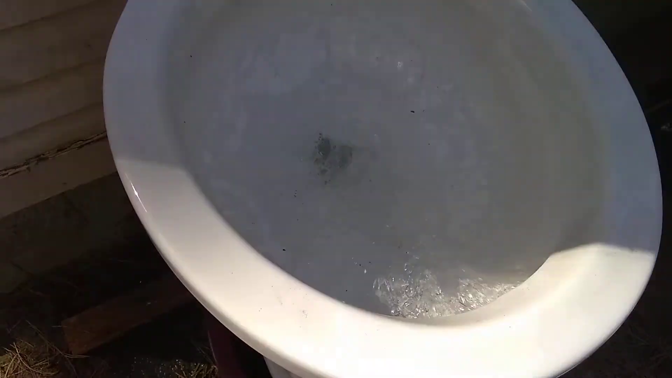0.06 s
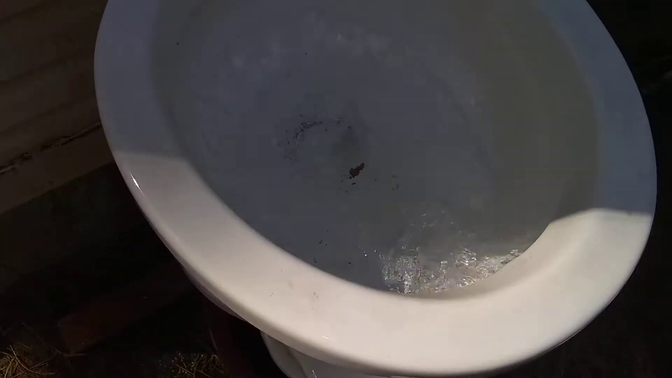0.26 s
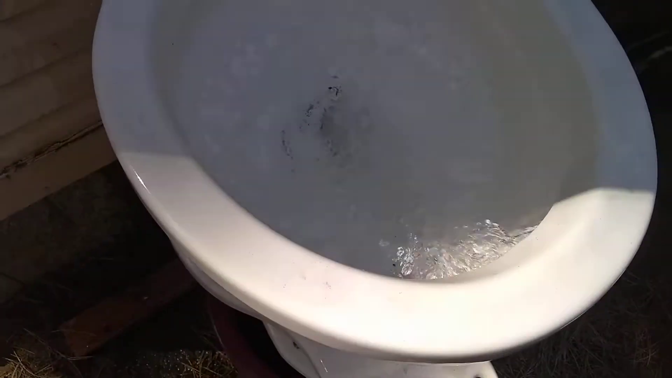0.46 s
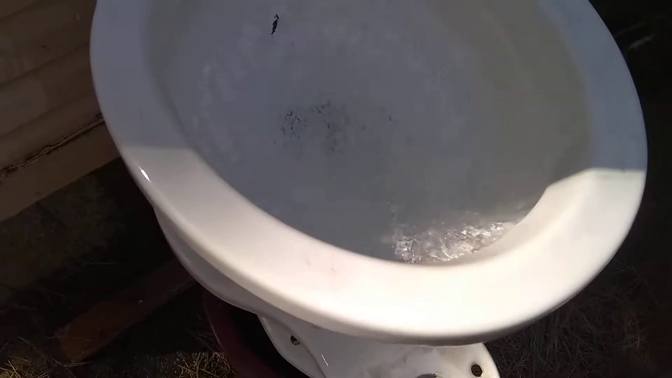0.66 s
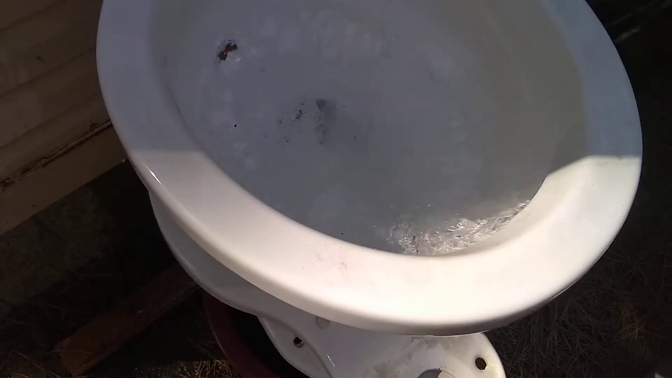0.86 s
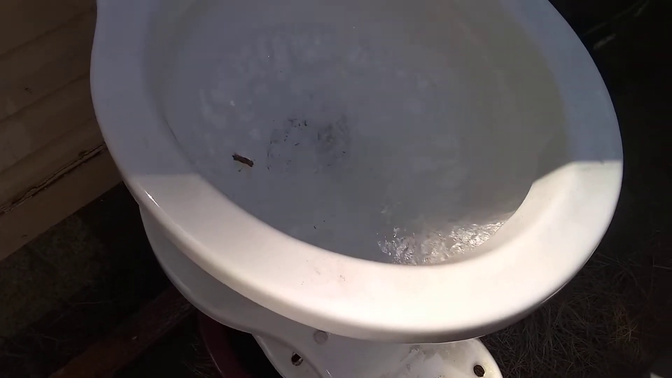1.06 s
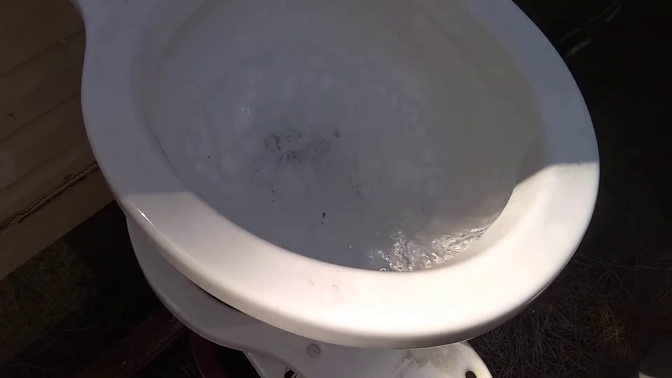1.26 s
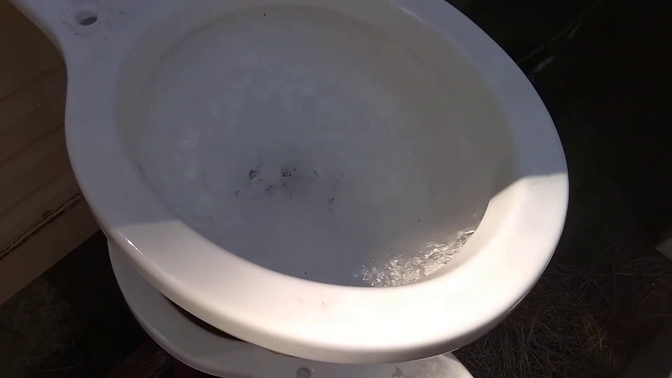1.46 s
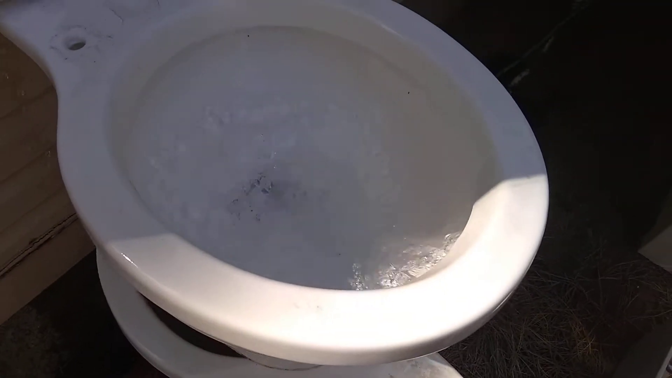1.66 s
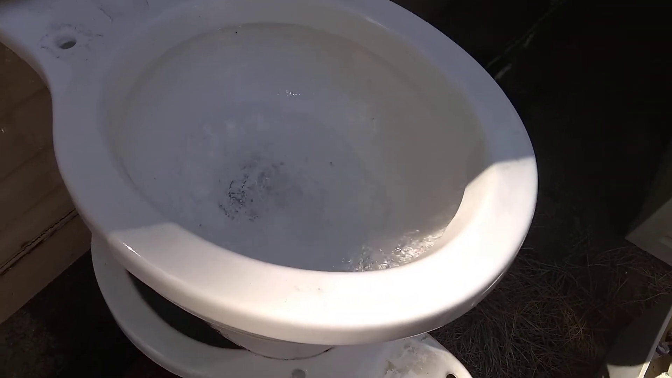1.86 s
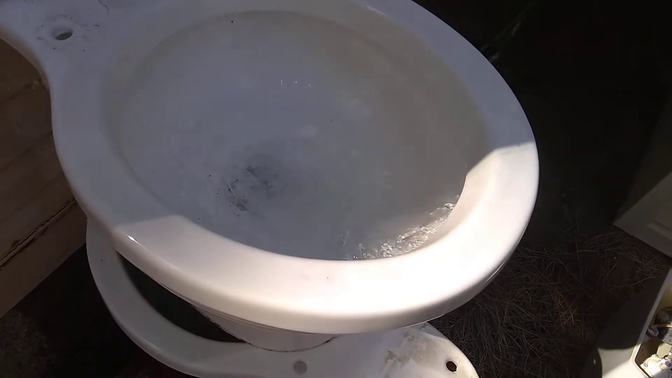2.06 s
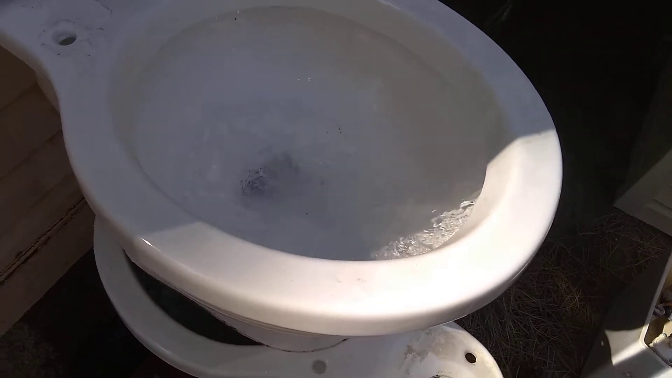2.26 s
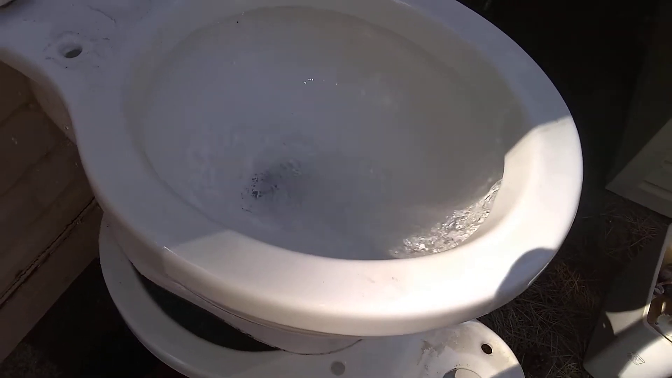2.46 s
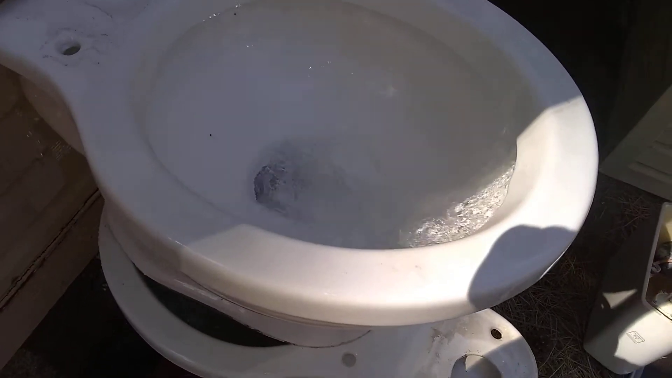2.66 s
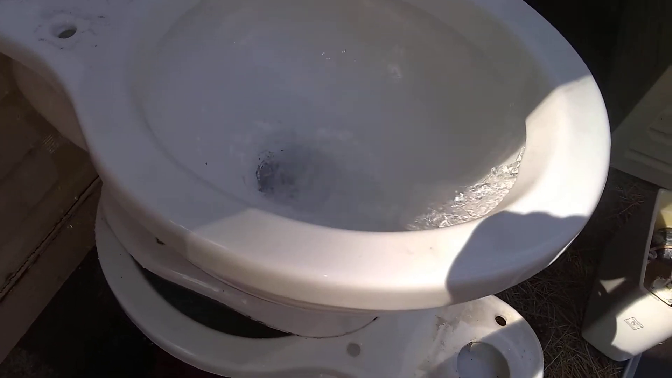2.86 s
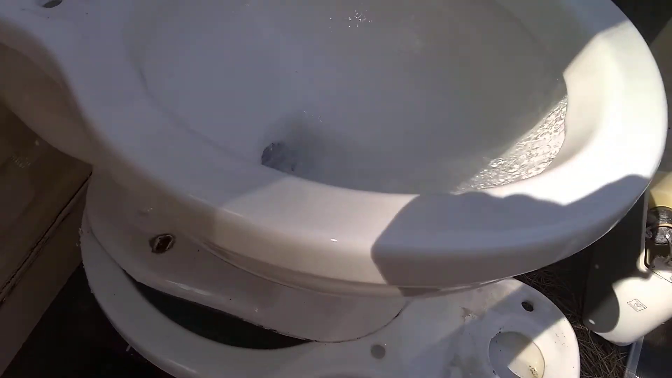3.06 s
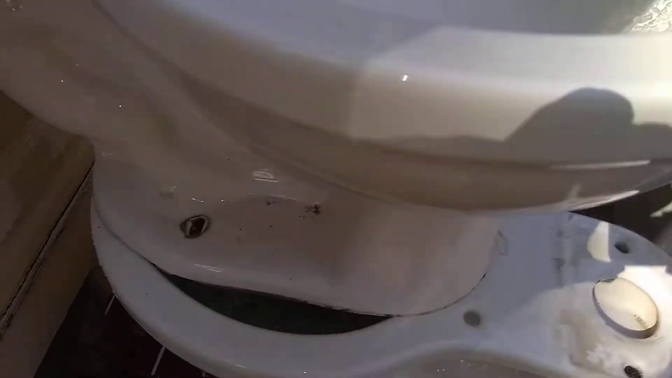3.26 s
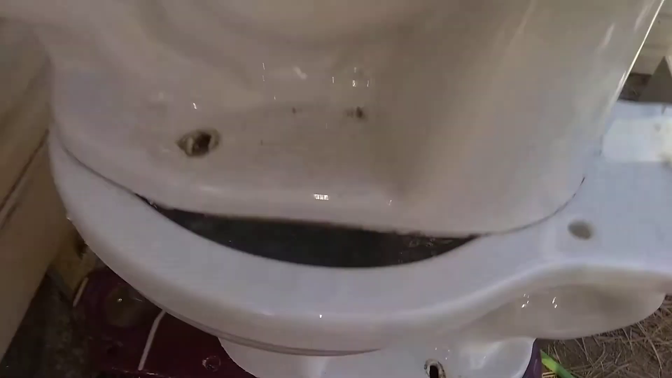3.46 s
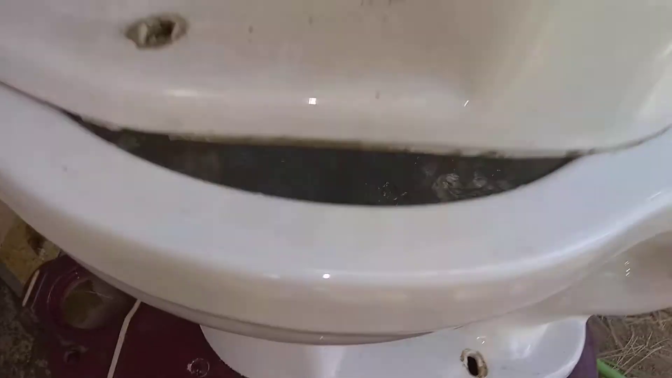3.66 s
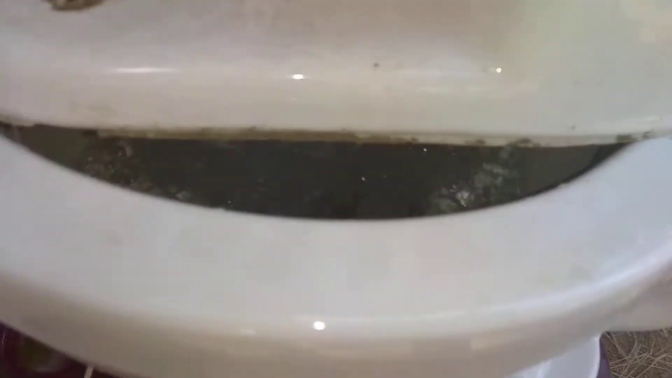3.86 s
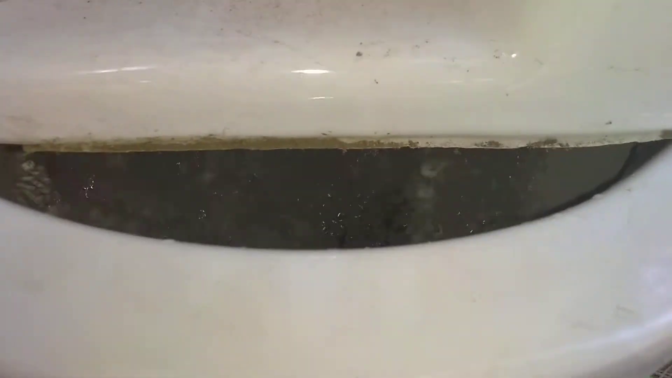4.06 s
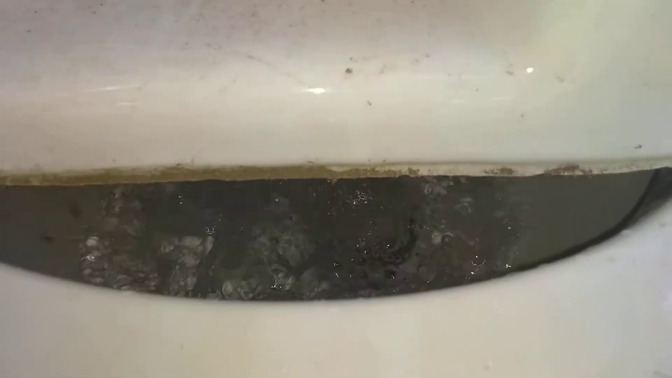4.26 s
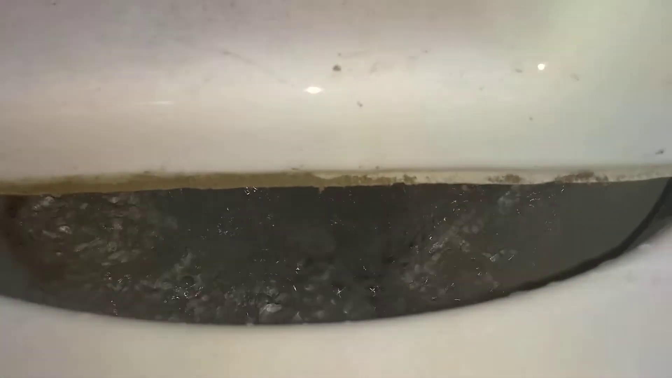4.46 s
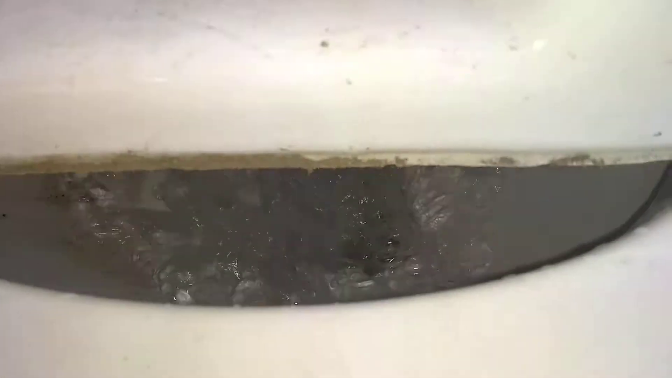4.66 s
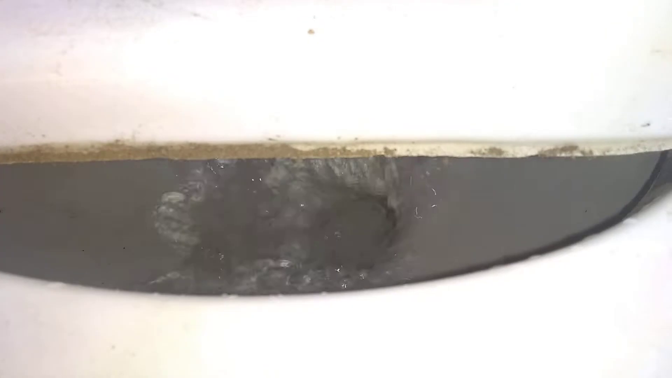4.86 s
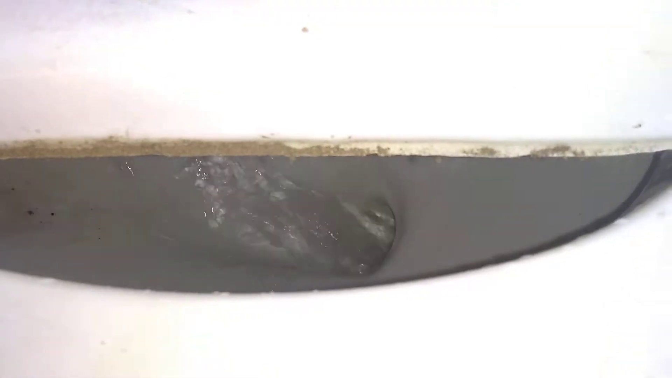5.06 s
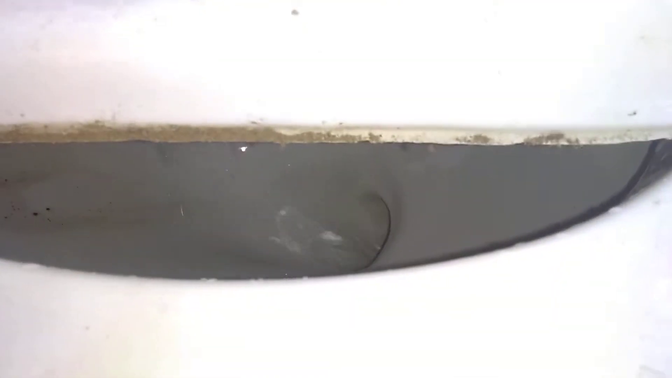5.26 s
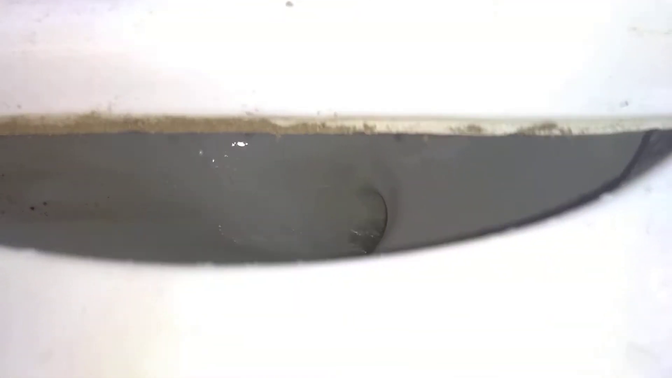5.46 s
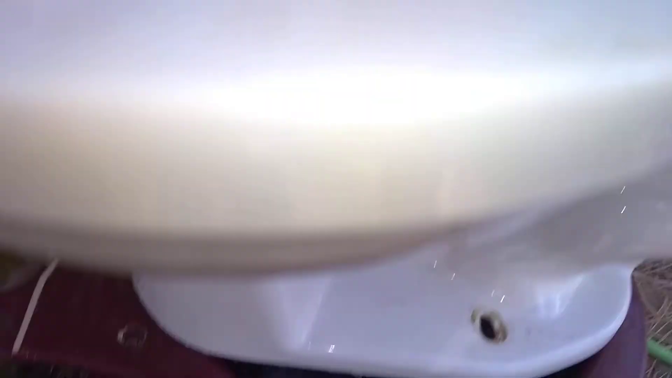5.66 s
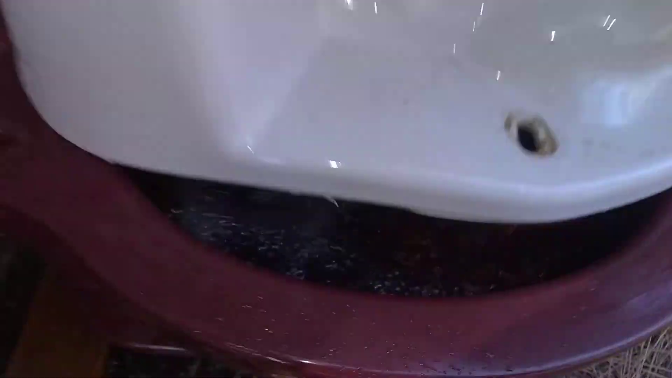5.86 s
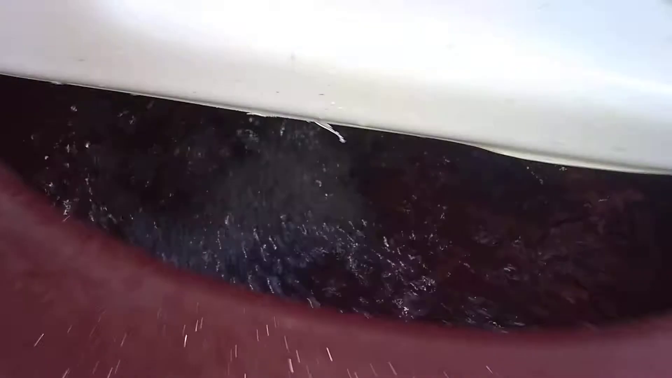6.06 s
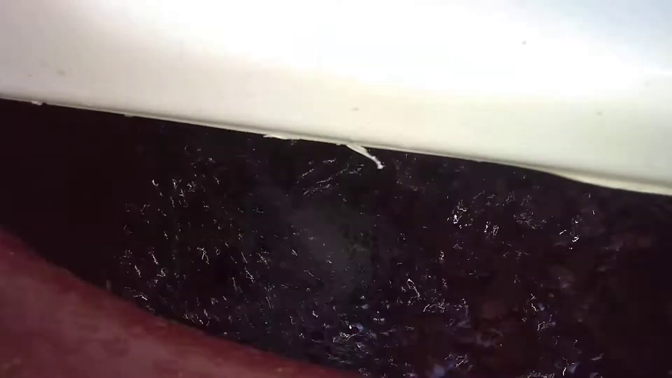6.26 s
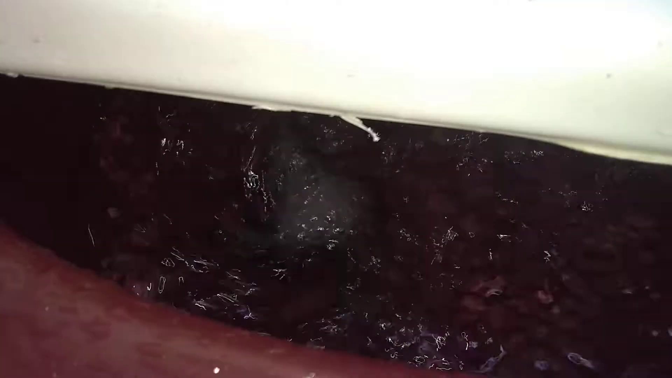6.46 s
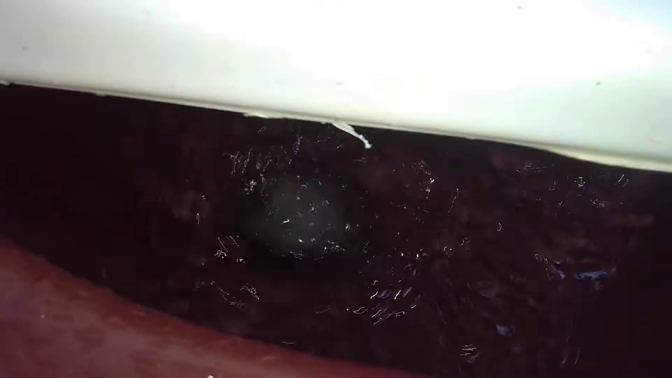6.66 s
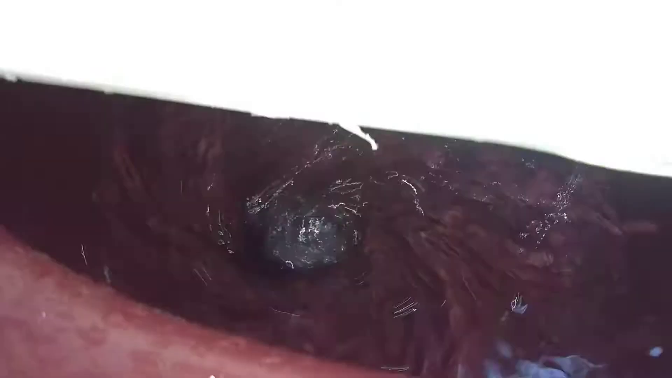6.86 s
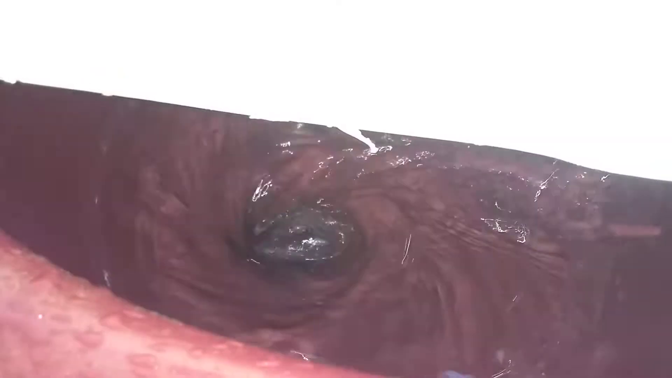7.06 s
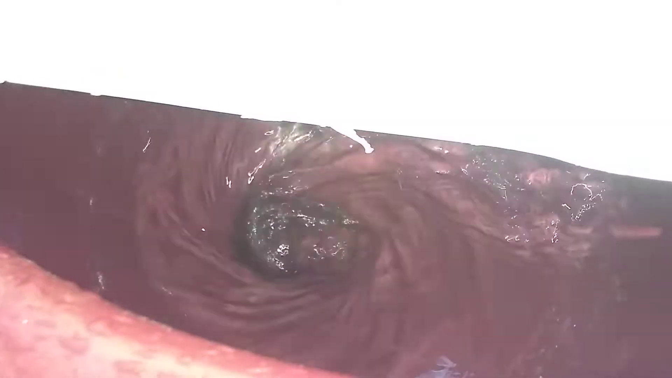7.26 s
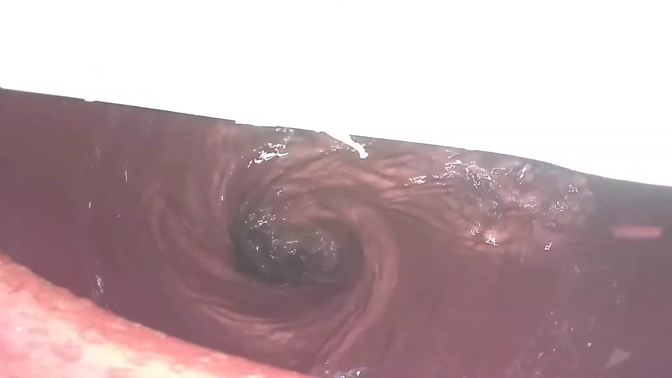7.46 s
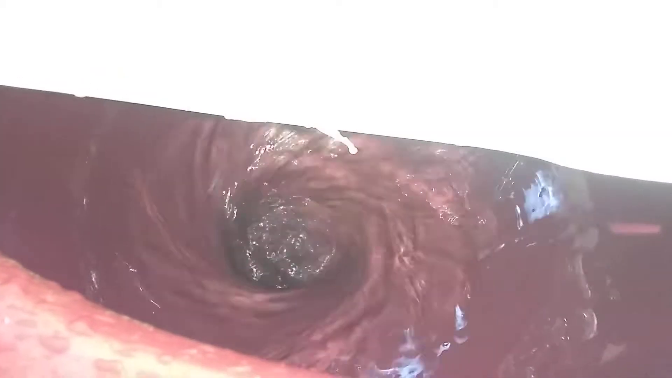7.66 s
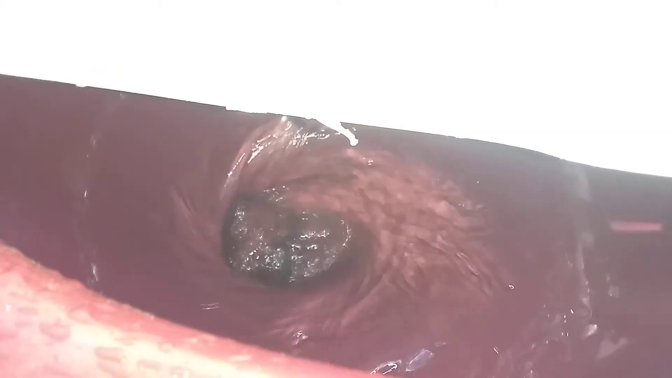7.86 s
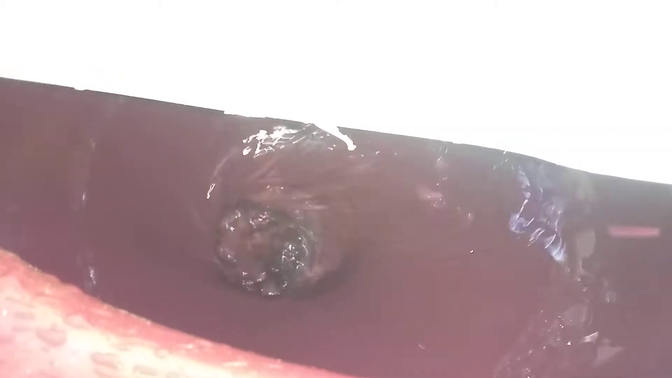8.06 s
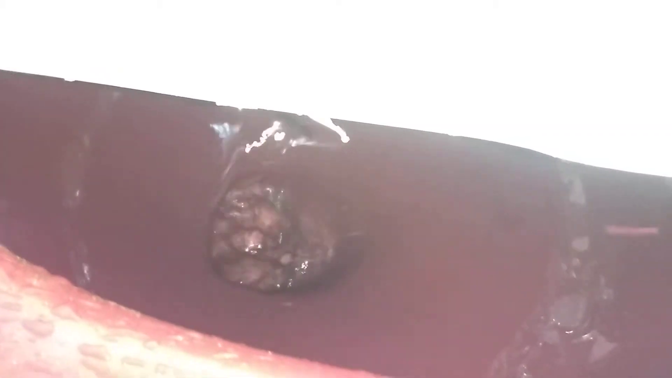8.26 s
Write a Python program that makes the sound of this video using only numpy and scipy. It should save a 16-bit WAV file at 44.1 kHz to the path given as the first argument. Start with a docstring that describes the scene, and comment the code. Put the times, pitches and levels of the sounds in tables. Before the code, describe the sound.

Close-up flushing water pours down from bowl to bowl, hissing and gurgling, then gulps air and swirls down a final drain.

```python
"""Outdoors, toilets stand stacked: water pours from the top bowl to the one below, then into a basin with a vortex.
Swarms of ringing bubbles and hissing spray make the rush, coloured by the air resonances of each hollow.
Slugs of water make the trapways and the siphon pipe boom; swallowed air gulps and splutters; drops spit on the china.
A hand-held stereo microphone follows the water down, so each hollow takes over from the one above."""
import sys
import numpy as np
from scipy import signal
from scipy.fft import rfft, irfft
from scipy.io import wavfile
from scipy.ndimage import uniform_filter1d

SR = 44100
rng = np.random.default_rng(int(sys.argv[2]) if len(sys.argv) > 2 else 0)


def inscribe(sig):
    """Save sig as 16-bit PCM at rate SR to the path in sys.argv[1].

    A 1-D sig is mono; a 2-D sig holds one channel per row.
    Samples are clipped to [-1, 1] before scaling.
    """
    pcm = np.round(np.clip(np.atleast_2d(sig).T, -1, 1) * 32767)
    wavfile.write(sys.argv[1], SR, pcm.astype(np.int16))


N = 366471
TIME = np.arange(N) / SR
TAPS = 8192  # length of the filters in samples
HZ = np.fft.rfftfreq(TAPS, 1 / SR)

# slugs of air forced through a trapway: (crest time [s], relative level [dB], tenfold build-up time [s])
AIR_THROBS = [(.915, -32.5, 0.018), (1.31, -29.5, 0.014), (1.98, -31, 0.085), (5.118, -29.5, 0.0065),
              (5.178, -26, 0.0073), (5.225, -29, 0.043), (5.362, -20.5, 0.022), (5.418, -23.5, 0.04),
              (5.528, -25, 0.016), (5.558, -15.5, 0.07), (5.96, -34.5, 0.1), (7.72, -41, 0.054),
              (7.858, -22.5, 0.011), (7.925, -25, 0.024), (8.006, -17.5, .025), (8.048, -14.5, 0.062),
              (8.16, -26, 0.055)]
THROB_FALL_S = 0.078  # a throb sinks tenfold in this time
GLIDE = .07  # a gulped bubble's pitch climbs by twice this share over its ring time


def rush():
    """Large bubbles slosh, small ones churn, droplets tick and spray fizzes; slaps of water stir most of it."""
    # colours of the three layers: (frequency [Hz], relative gain [dB])
    slosh_colour = [(60, -42), (130, -2), (250, 1), (500, -3.5), (900, -20.5)]
    churn_colour = [(60, -81), (300, -3.5), (580, -4.5), (1300, -0.5), (1900, 3.5), (2300, 4.5), (2800, -3),
                    (5000, -18), (7000, -17), (14000, -22)]
    spray_colour = [(1500, 2), (3000, -1.5), (4500, -1), (6500, -5), (10000, 3), (12400, 7.5), (14200, 1)]
    beat = slaps(per_s=26, fade_s=0.025)
    spatter = slaps(per_s=51, fade_s=0.009)  # the spray also has a beat of its own
    clumps = slaps(per_s=10, fade_s=0.029)

    large = swarm(264.3, 592, cycles=44.0, spread_db=3.0, rise=0.12, count=1500, size=1800)
    small = swarm(541.8, 4515, cycles=29.2, spread_db=2.0, rise=0.066, count=20000, size=900)
    loose = swarm(499.4, 2860, cycles=34, spread_db=1.8, rise=.18, count=3600, size=1500) * amp(3 * clumps)
    drops = swarm(2180, 6000, cycles=24, spread_db=2.5, rise=0.12, count=1600, size=300)
    fine = swarm(2770, 16040, cycles=32.0, spread_db=-0.5, rise=0.1, count=30000, size=120)
    wash = amp(-2) * rng.standard_normal(N)
    mist = amp(4.5) * rng.standard_normal(N)

    in_basin = nearness()[2]  # its vortex sheds fewer, larger bubbles, in clumps
    bubbles = np.sqrt(1 - 0.58 * in_basin) * small + amp(-1) * np.sqrt(in_basin) * loose + wash
    slosh = hollows(colour(large * amp(2.1 * beat), read(slosh_colour)))
    churn = hollows(colour(bubbles * amp(0.55 * beat * (1 - in_basin)), read(churn_colour)))
    stirred = (fine + mist) * amp(1.63 * beat + 1.0 * spatter)
    spray = colour(stirred + amp(-2.5) * drops, read(spray_colour))

    # from 5.99 s the fall into the basin runs out: its spray thins and the vortex churns more quietly
    run_out = np.clip((TIME - 5.99) / 1, 0, 1)
    rocked = amp(-16.0) * swells(AIR_THROBS, THROB_FALL_S)  # a throb also rocks the water
    sloshing = np.hypot(flowing(db=-47.0, follows=1.02, surges=2.3), rocked)
    churning = flowing(db=-34.0, follows=0.6, surges=1.25) * amp(-4 * in_basin * run_out)
    spraying = flowing(db=-37.0, follows=0.72, surges=1.0) * amp(-10 * run_out)
    near_water = sloshing * steadied(slosh, 0.99) + churning * slackened(steadied(churn, 0.19))
    return near_water + spraying * steadied(spray, 0.93)


def gulps():
    """Big bubbles swell and ring, splutters climb in pitch in a little spray; part of it rings on in the hollow."""
    # big bubbles ringing out of the water:
    # (time [s], relative peak [dB], starting pitch [Hz], time to ring down 60 dB [s])
    big_bubbles = [(.148, -28.5, 394, 0.055), (.212, -26.5, 810, 0.027), (0.253, -28.5, 362, 0.051),
                   (.43, -21.5, 790, 0.04), (1.906, -26, 335, 0.057), (2.658, -25, 245, 0.059),
                   (3.117, -24.5, 720, 0.028), (3.191, -20, 299, 0.026), (3.265, -17.5, 333, 0.028),
                   (3.279, -19.5, 304, 0.081), (3.39, -20.5, 675, 0.028), (3.402, -22.5, 307, 0.058),
                   (3.636, -23.5, 723, 0.069), (3.84, -25.5, 1413, 0.063), (4.088, -23.5, 1433, 0.069),
                   (4.168, -22.5, 1480, .03), (4.204, -16, 1664, 0.03), (4.225, -31.5, 451, 0.12),
                   (4.274, -28, 702, 0.051), (4.278, -29, 467, .05), (4.309, -26.5, 1215, 0.056),
                   (4.355, -31, 460, 0.071), (4.386, -28, 1630, 0.086), (4.541, -26, 760, 0.038),
                   (4.63, -28, 399, 0.053), (4.828, -39, 732, 0.032), (5.225, -23.5, 1040, 0.019),
                   (5.232, -22, 650, 0.16), (5.358, -27.5, 623, 0.067), (5.424, -26, 980, 0.049),
                   (5.491, -30, 804, 0.18), (5.522, -26.5, 658, 0.064), (5.544, -27, 100, 0.073),
                   (5.55, -25.5, 1130, .04), (5.596, -29, 850, .09), (6.096, -22, 1543, 0.062),
                   (6.241, -30, 880, .04), (6.252, -18.5, 1270, 0.048), (6.261, -21, 1520, 0.051),
                   (6.303, -26.5, 975, 0.026), (6.354, -29, 644, 0.056), (6.569, -30, 1020, 0.05),
                   (6.595, -26.5, 602, 0.09), (6.74, -25.5, 760, 0.11), (7.097, -34, 646, 0.033),
                   (7.227, -28, 650, 0.032), (7.322, -37, 606, 0.16), (7.38, -32, 590, 0.029),
                   (7.419, -33, 980, 0.022), (7.476, -34.5, 653, 0.067), (7.817, -28, 606, 0.099),
                   (7.845, -20, 210, .09), (7.842, -15.5, 1496, 0.056), (7.874, -20, 1030, 0.03),
                   (7.991, -24, 507, .08), (8.025, -24.5, 473, 0.11), (8.066, -13, 1450, 0.019),
                   (8.155, -8.5, 1540, 0.025)]
    # swallowed air torn into clusters of small bubbles:
    # (time [s], relative rms level [dB], middle pitch [Hz], length [s])
    air_tears = [(0.367, -35.5, 1000, 0.081), (0.445, -37.5, 3000, 0.031), (3.266, -27.5, 614, 0.049),
                 (3.384, -33.5, 420, 0.042), (4.006, -28.5, 1360, 0.015), (5.343, -29, 990, 0.03),
                 (5.488, -33, 900, 0.02), (5.517, -32, 860, 0.011), (5.599, -31, 1010, 0.017),
                 (6.476, -36.5, 945, 0.032), (6.582, -30.5, 1220, 0.031), (6.593, -36.5, 2460, 0.029),
                 (6.926, -36, 1020, 0.031), (7.188, -34, 1010, 0.013), (7.593, -37.5, 2000, 0.032),
                 (7.68, -30, 1290, 0.037), (7.834, -24, 1274, 0.022), (7.914, -38.5, 3600, 0.012),
                 (7.965, -30, 1450, 0.063), (7.976, -36.5, 3700, 0.018), (8.021, -22, 1280, 0.028),
                 (8.026, -43, 3670, 0.021), (8.07, -26.5, 1400, .015), (8.117, -38, 3870, .014),
                 (8.146, -28, 1510, 0.027), (8.15, -26.5, 1760, 0.0082), (8.263, -32.5, 1350, 0.029)]
    t = np.arange(SR // 6) / SR
    tones, clusters = np.zeros((2, N))
    for s, db, hz, ring_s in big_bubbles:
        swell = 1 - np.exp(-t / (.04 * ring_s))
        tone = swell * bubble(t, hz, ring_s, GLIDE)
        add(tones, s, amp(db) * tone / abs(tone).max())
    for s, db, hz, length in air_tears:
        add(clusters, s, amp(db) * splutter(t, hz, length, cycles=19.4, spray_db=-11.5, count=26))
    water = rebounds(tones + amp(-1) * clusters)
    ringing = .3  # share sent through the resonances of the hollow
    return (1 - ringing) * water + ringing * hollows(water)


def trapways():
    """The traps hum unevenly with the flow, and throb with a clean note when air is forced through."""
    # air resonances of a trap: (frequency [Hz], width [Hz], relative level [dB])
    trap_modes = [(196.7, 15, 21)]
    # hum under the top bowl, middle bowl, basin and open drain: (relative level [dB])
    hum_levels = [-42, -43.5, -51.5, -40]
    unevenness = amp(1.84 * slaps(per_s=9.4, fade_s=0.075))
    hum = by_hollow(hum_levels) * flowing(db=-1, follows=0.96, surges=0.36) * unevenness
    throb = swells(AIR_THROBS, THROB_FALL_S)
    booming = np.hypot(hum, amp(-10.0) * throb) * boom(trap_modes, lowest_hz=144.0, skirt_db=22.0)
    return booming + amp(-3.5) * throb * note(190)


def siphons():
    """Below the top bowl the pipe drones with the flow, and sounds its note at each pull."""
    # air resonances of the pipe: (frequency [Hz], width [Hz], relative level [dB])
    pipe_modes = [(75.4, 19, -13), (116.6, 8.1, 9), (150.5, 12, 11)]
    # drone at the top bowl, middle bowl, basin and open drain: (relative level [dB])
    drone_levels = [-88, -54, -53.5, -45]
    # pulls of a siphon on the pipe: (crest time [s], relative level [dB], tenfold build-up time [s])
    siphon_pulls = [(4.25, -39, .55), (4.44, -40, 0.24), (5.21, -29, 0.051), (5.39, -24, 0.098),
                    (5.56, -23.5, 0.13), (5.63, -21.5, 0.067), (8.15, -37, 0.2)]
    drone = by_hollow(drone_levels) * flowing(db=-2.5, follows=0.97, surges=0.33)
    pull = swells(siphon_pulls, fall_s=0.15)
    booming = np.hypot(drone, amp(-9.5) * pull) * boom(pipe_modes, lowest_hz=54, skirt_db=19)
    return booming + amp(-5) * pull * note(151)


def spits():
    """A drop bursts on the china into a brief bright shower: noise rung at its pitch and dying fast."""
    # (time [s], relative level [dB], centre pitch [Hz])
    china_drops = [(0.463, -35, 11400), (0.565, -38, 12500), (2.651, -33.5, 11700), (4.953, -35, 12100),
                   (6.272, -37, 13200), (6.6285, -39, 11600), (6.8387, -40, 9400), (6.945, -34, 12200),
                   (8.146, -34, 10900)]
    t, out = np.arange(SR // 6) / SR, np.zeros(N)
    for s, db, hz in china_drops:
        ring = bubble(t, hz, 0.001, rise=0)
        shower = evened(signal.fftconvolve(rng.standard_normal(len(t)), ring)[:len(t)])
        add(out, s, amp(db - 60 * t / 0.058) * shower)
    return amp(7.5) * out


def swarm(low_hz, high_hz, cycles, spread_db, rise, count, size):
    """Many bubbles at random moments, their levels spread with a long tail and rising with pitch; rms of one."""
    when, pitch, loudness, damping = rng.random((count, 4)).T[:, :, None]
    hz = low_hz * (high_hz / low_hz) ** pitch
    spread = amp(spread_db * np.minimum(-np.log(1 - loudness), 4))
    height = spread * np.sqrt(hz) * rng.choice([-1, 1], (count, 1))
    t60 = cycles * (.5 + damping) / hz
    rings = height * bubble(*map(np.float32, (np.arange(size) / SR, hz, t60, rise)))
    places = (when * N).astype(int) + np.arange(size)
    return evened(np.bincount(places.ravel(), rings.ravel(), N)[:N])


def bubble(t, hz, t60, rise):
    """A pocket of air rings and dies, its pitch rising as it nears the surface."""
    swell = 1 - np.exp(-2 * hz * t)  # it pinches off over the first cycle
    return swell * np.sin(2 * np.pi * hz * t * (1 + rise * t / t60)) * amp(-60 * t / t60)


def splutter(t, middle_hz, length, cycles, spray_db, count):
    """A quick run of short bubbles of mixed sizes, scaled to an rms of one over its length, in a little spray."""
    progress = (np.arange(count) + rng.random(count))[:, None] / count
    size = rng.permutation(np.linspace(-1, 1, count))[:, None]
    # the bubbles get smaller and fainter as it goes on
    octaves = .42 * (size + size ** 3) + .45 * (progress - .5)
    hz = middle_hz * 2 ** octaves
    pops = bubble(np.maximum(t - progress * length, 0), hz, cycles / hz, GLIDE)
    run = (rng.choice([-1, 1], (count, 1)) * amp(-5 * progress) * hz ** 1.1 * pops).sum(0)
    spray = amp(spray_db - 10 * (t / length) ** 2) * rng.standard_normal(len(t))
    return run / np.sqrt(np.sum(run ** 2) / (length * SR)) + spray


def boom(modes, lowest_hz, skirt_db):
    """Slugs of water shake the air in a trap, which hums at its resonances."""
    response = sum(amp(db) / np.hypot(1, 2 * (HZ - hz) / width) for hz, width, db in modes)
    octaves_below = np.maximum(np.log2(lowest_hz / (HZ + 1)), 0)
    octaves_above = np.maximum(np.log2((HZ + 1) / 250), 0)
    response_db = 20 * np.log10(response) - skirt_db * (octaves_below + octaves_above)
    slugs = swarm(51.2, 590, cycles=2.55, spread_db=1.0, rise=0, count=900, size=1500)
    return steadied(colour(slugs, np.maximum(response_db, -100)), .09)


def note(hz):
    """The slightly unsteady tone of a column of air, with an rms of one."""
    return np.sqrt(2) * np.sin(2 * np.pi * hz * TIME + wander(per_s=20, turn=.5))


def hollows(x):
    """Each hollow rings in its own way, a little higher or lower as the water in it rocks."""
    # air resonances of each hollow, the last being the drain once open:
    # (centre with the water level [Hz], width [Hz], relative lift [dB])
    top_bowl = [(415.4, 22, 12), (714, 99, 12), (988, 150, 10), (1135, 34, 5), (1220, 88, 4.5),
                (1417, 110, 5), (1735, 440, 4)]
    middle_bowl = [(468, 80, 7.5), (702, 70, 12), (1020, 23, 8.5), (1216, 21, 7.4), (1480, 72, 3.9),
                   (1670, 580, 4.4)]
    basin = [(614, 110, 8.5), (962, 45, 8.4), (1275, 38, 12.3)]
    open_drain = [(445, 30, 10), (820, 130, -6.5), (1000, 45, 5.5), (1245, 50, 8), (1490, 50, 7),
                  (1730, 55, 6)]
    rocking = 0.017  # largest shift of the resonances, as a share
    out, rock = np.zeros(N), np.sin(wander(per_s=14, turn=0.98))
    tilt = rock * abs(rock)
    for share, modes in zip(nearness(), [top_bowl, middle_bowl, basin, open_drain]):
        for side in (-1, 0, 1):  # crossfade between lowered, level and raised resonances
            lift_db = sum(db / (1 + (2 * (HZ - hz * (1 + side * rocking)) / width) ** 2)
                          for hz, width, db in modes)
            blend = np.maximum(1 - abs(tilt - side), 0)
            out += colour(x * share * blend, lift_db - 3.5)
    return out


def rebounds(x):
    """Dense reflections between the glazed walls of a bowl give each sound a short tail."""
    t = np.arange(TAPS) / SR
    tail = rng.standard_normal(TAPS) * amp(-60 * t / .11)
    return x + amp(-7) * signal.oaconvolve(x, tail / np.linalg.norm(tail))[:N]


def nearness():
    """The share heard from the top bowl, the middle bowl, the basin, and the basin's drain once it draws air."""
    lower = np.interp(TIME, [3.2, 3.6], [0, 1])
    lowest = np.interp(TIME, [5.75, 6.0], [0, 1])
    emptied = np.interp(TIME, [7.825, 7.84], [0, 1])
    return 1 - lower, lower * (1 - lowest), lowest * (1 - emptied), emptied


def by_hollow(levels_db):
    """Gain of a sound that has its own level in each hollow."""
    return sum(amp(db) * share for db, share in zip(levels_db, nearness()))


def flowing(db, follows, surges):
    """Gain of a layer: its level at full flow, and how strongly it follows the flow and its surges."""
    # strength of the flow near the microphone: (time [s], level relative to the full rush [dB])
    flow_points = [(0, -2), (.47, -1), (.51, -10.5), (.74, -8), (1.35, -1.5), (2.9, -0.5), (3.35, 4),
                   (3.85, 1), (4.25, 4.5), (4.82, -6), (5.03, -9.5), (5.25, -2.5), (6.2, 0.5), (6.7, -1),
                   (7.05, -10), (7.5, -5.5), (7.8, 1), (8.3, -3)]
    # water heaping up, then breaking off: (start [s], length [s], lift before the layer's scaling [dB])
    heaps = [(0.294, 0.14, 2), (1.72, 0.21, 2), (2.496, 0.15, 2.5), (3.125, 0.16, 3), (3.523, 0.2, 2.5),
             (4.648, 0.19, 5.5), (4.898, 0.056, 7), (7.785, 0.288, 4.5), (8.076, 0.065, 6.5)]
    break_s = 0.0091  # a surge collapses in this time
    heaped_db = sum(np.interp(TIME, [s, s + length, s + length + break_s], [0, lift, 0])
                    for s, length, lift in heaps)
    flow_db = np.interp(TIME, *np.transpose(flow_points))
    return amp(db + follows * flow_db + surges * heaped_db)


def slackened(x):
    """When the stream slackens it drives few deep bubbles under; the deep churning slowly returns."""
    slack_s, refill_s, deep_hz = .49, 0.68, 760
    dip = amp(-16 * (TIME > slack_s) * np.exp(-abs(TIME - slack_s) / refill_s))
    deep = signal.sosfiltfilt(signal.butter(2, deep_hz, fs=SR, output="sos"), x)
    return x + (dip - 1) * deep


def slaps(per_s, fade_s):
    """Tongues of water land abruptly and run off: an uneven beat about zero, with an rms of one."""
    hits = (rng.random(N) < per_s / SR) * rng.uniform(0.76, 1, N)
    energy = signal.lfilter([1], [1, -np.exp(-1 / (fade_s * SR))], hits)
    beat = np.sqrt(abs(energy))
    return evened(beat - uniform_filter1d(beat, SR // 6))


def swells(rows, fall_s):
    """Each swell grows tenfold over its build-up and sinks tenfold in every fall time after its crest."""
    t = TIME[::32]
    each = [amp(db) * 10 ** -np.minimum(np.maximum((s - t) / build_s, (t - s) / fall_s), 10)
            for s, db, build_s in rows]
    return np.interp(TIME, t, np.linalg.norm(each, axis=0))


def wander(per_s, turn):
    """A phase that drifts at random, in radians."""
    steps = rng.standard_normal(size=1000)
    return np.interp(TIME * per_s, np.arange(len(steps)), turn * np.cumsum(steps))


def amp(db):
    """Turns decibels into an amplitude factor."""
    return 10 ** (np.asarray(db) / 20)


def evened(x):
    """Scales to an rms of one."""
    return x / np.sqrt(np.mean(x ** 2) + 1e-20)


def steadied(x, seconds):
    """Holds the slow level of a sound near one and keeps its quick flutter."""
    window = np.hanning(max(int(seconds * SR), 9))
    power = signal.oaconvolve(x ** 2, window / window.sum(), "same")
    return x / np.sqrt(abs(power) + 1e-3 * power.mean())


def read(points):
    """A table over frequency, joined on a log axis."""
    hz, value = np.transpose(points)
    return np.interp(np.log(HZ + 1), np.log(hz), value)


def add(mix, s, sound):
    """Mixes a sound in at a time."""
    part = mix[max(round(s * SR), 0):][:len(sound)]
    part += sound[:len(part)]


def colour(x, db):
    """Causal (minimum-phase) filter with the given gain: its peaks ring after each click."""
    cepstrum = irfft(np.log(amp(db)))
    cepstrum[1:TAPS // 2] *= 2
    cepstrum[TAPS // 2 + 1:] = 0
    return signal.oaconvolve(x, irfft(np.exp(rfft(cepstrum))))[:N]


def widened(x, lag_rad=0, left_db=0):
    """Stereo widening: the right channel has later, duller treble, partly blurred by a drifting random phase."""
    # likeness of the two channels before the ripple: (frequency [Hz], likeness [0-1])
    channel_likeness = [(60, .7), (150, .96), (330, .96), (450, .8), (700, .95), (1050, .99), (4200, .88),
                        (6400, .75), (7400, .2)]
    # balance of the channels: (frequency [Hz], left minus right before left_db [dB])
    channel_balance = [(60, -2), (130, 0), (200, 1.3), (1000, .8), (1700, 2), (6500, 1.5), (8000, 5.5),
                       (10000, 11), (13500, 18)]
    delay_s = .000465
    t = np.arange(TAPS) / SR
    smear = rfft(rng.standard_normal(TAPS) * amp(-60 * t / .05))
    lag = np.maximum(2 * np.pi * HZ * delay_s - np.pi, 0)
    # the widening makes the channels' likeness ripple over frequency
    same = read(channel_likeness) * (1 - .6 * np.sin(lag) ** 2)
    right_gain = 1 / amp(read(channel_balance) + left_db)
    direct = irfft(right_gain * same * np.exp(-1j * (lag + lag_rad)))
    diffuse = 2 * np.fft.ifft(right_gain * np.sqrt(1 - same ** 2) * smear / abs(smear), TAPS)
    straight, blurred = [signal.oaconvolve(x, np.roll(taps, TAPS // 2))[TAPS // 2:][:N]
                         for taps in (direct, diffuse)]
    drifting = (blurred * np.exp(1j * wander(90, 1.3))).real
    return np.array([x, straight + drifting])


def scene():
    """Rush, traps, gulps and drops in the open air; the pipe is out of step between the two channels."""
    water = widened(rush() + trapways() + gulps() + spits())
    return water + widened(siphons(), lag_rad=1.76, left_db=-3.0)


def record(dry):
    """The microphone's bass cut and the recorder's band limit."""
    thinned = signal.sosfilt(signal.butter(3, 68, "high", fs=SR, output="sos"), dry)
    band_limit = signal.firwin(401, 14350, window=("kaiser", 8), fs=SR)
    return signal.oaconvolve(thinned, band_limit[None], "same")


dry = scene()
out = record(dry)
inscribe(out)
```